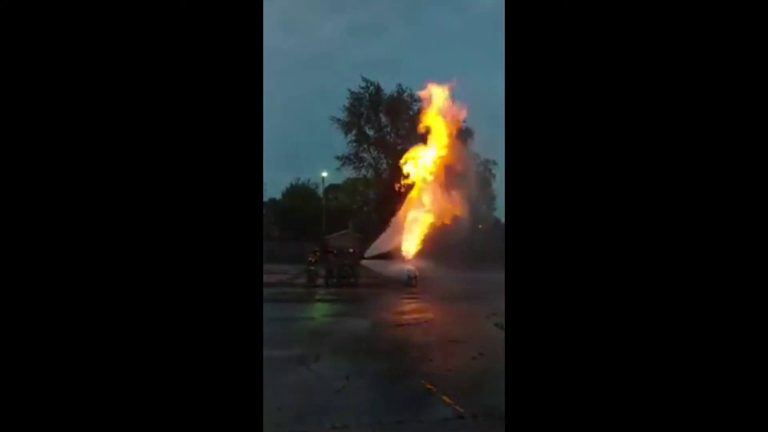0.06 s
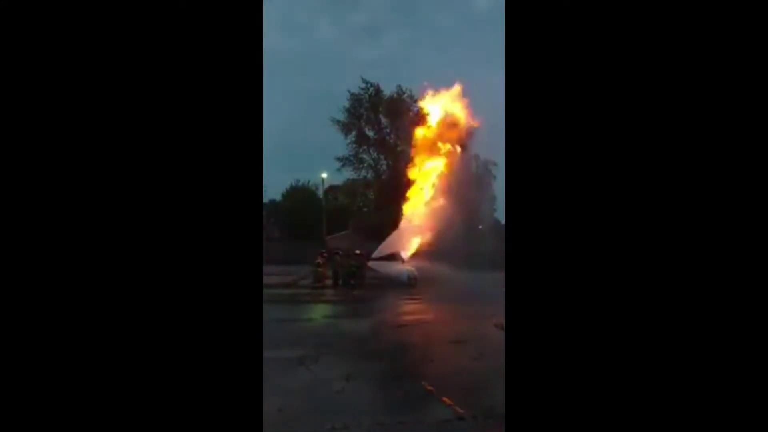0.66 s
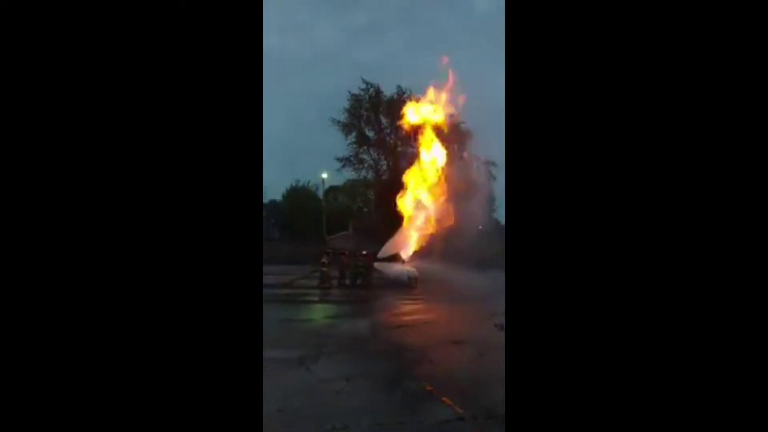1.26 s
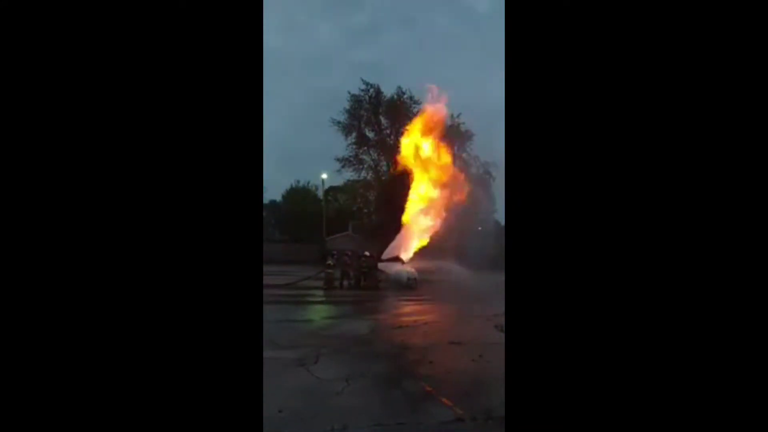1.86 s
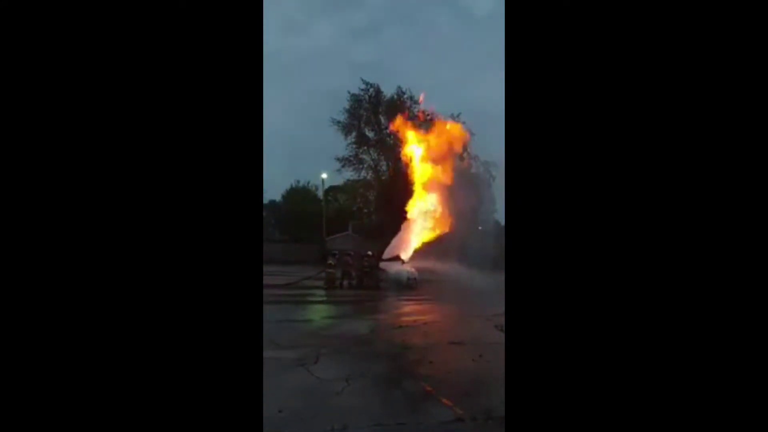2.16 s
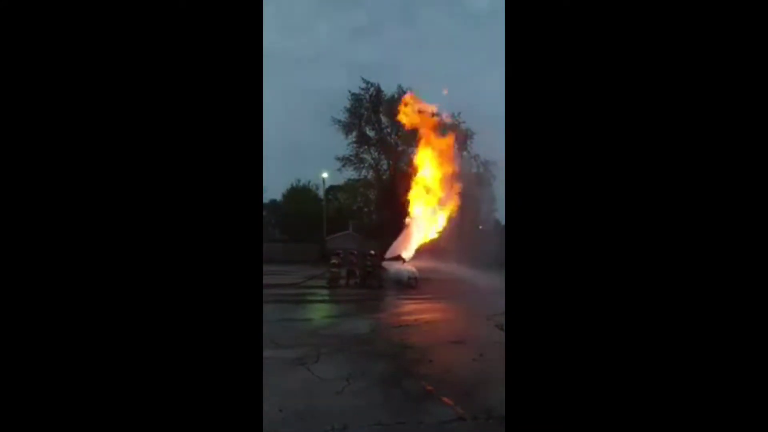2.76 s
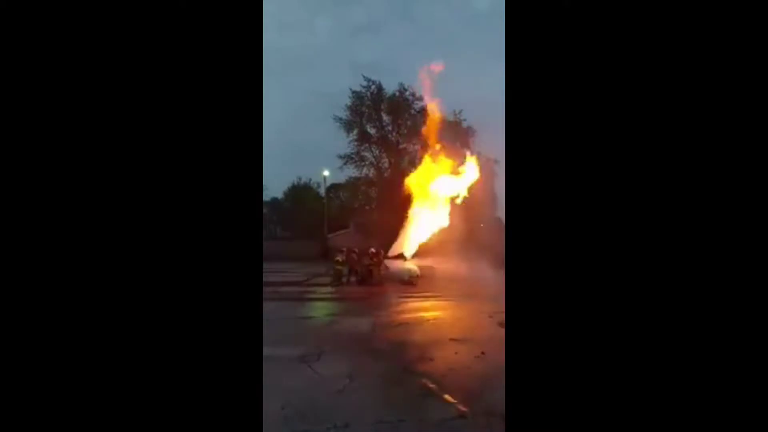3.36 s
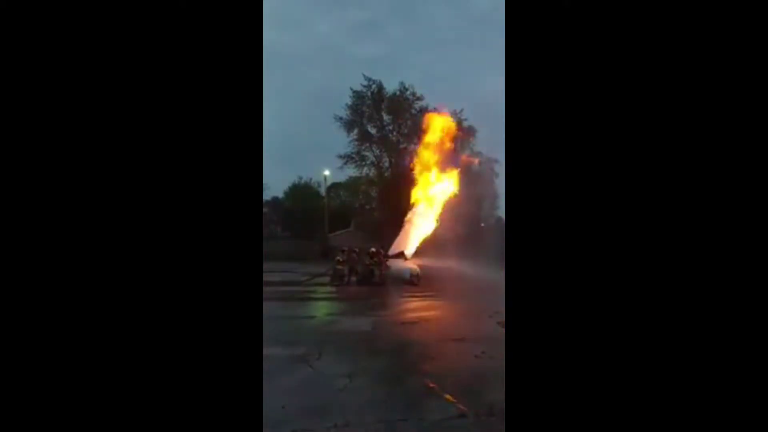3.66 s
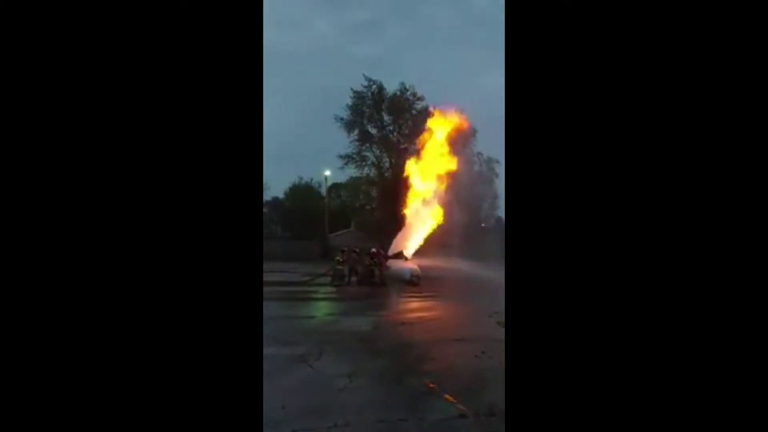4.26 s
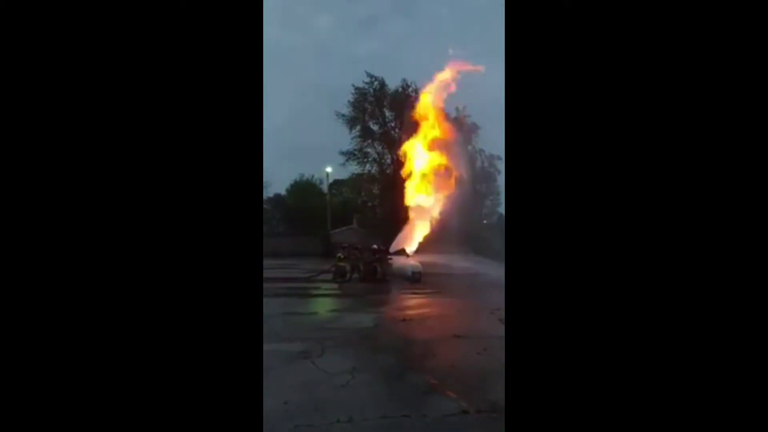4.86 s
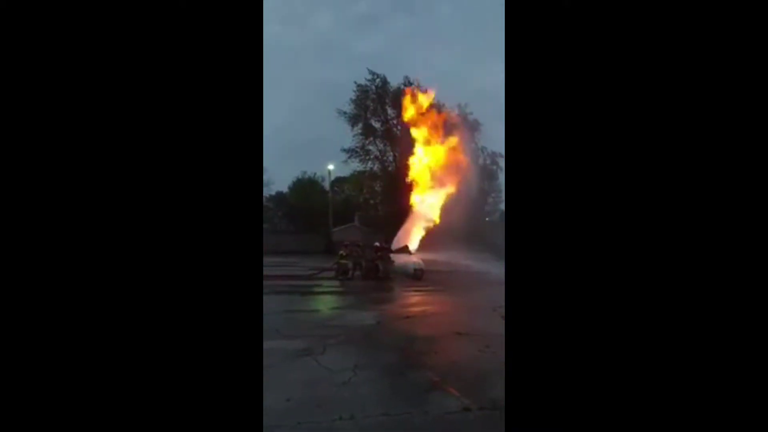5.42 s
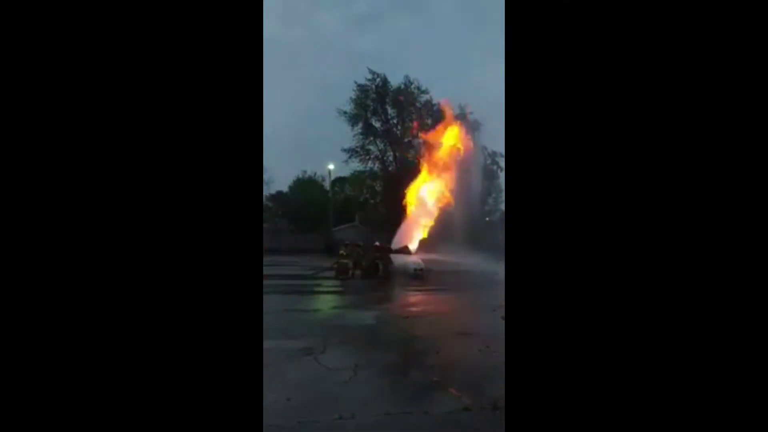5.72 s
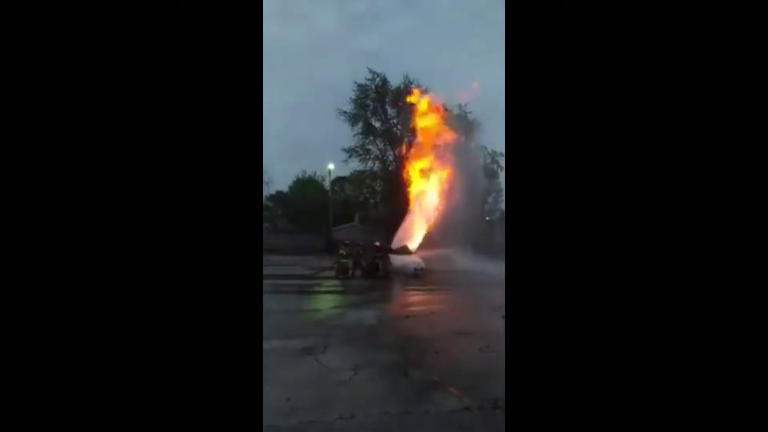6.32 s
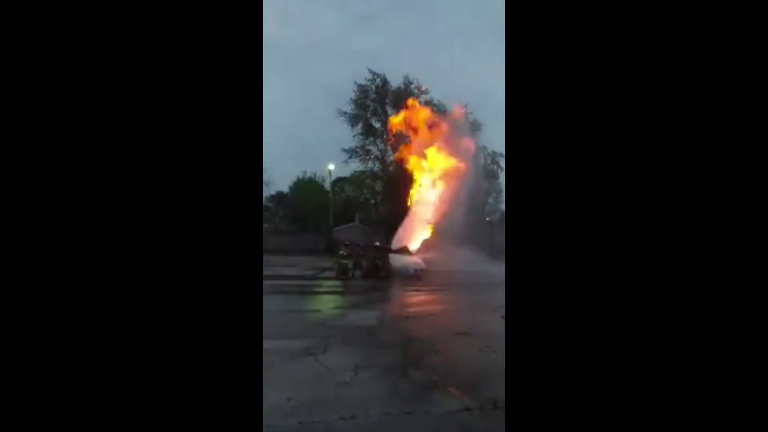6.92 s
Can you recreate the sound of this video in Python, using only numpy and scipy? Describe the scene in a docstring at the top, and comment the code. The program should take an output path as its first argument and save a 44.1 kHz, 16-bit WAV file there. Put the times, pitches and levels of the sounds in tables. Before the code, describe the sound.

In an open yard, a fluttering flame roar, a sharp gas hiss and the fizz of hoses spraying a tank blend into one continuous rush, heard from a distance. Wind bumps the handheld microphone at the start, again a second later, then hardest near three seconds, with short fuzzy hoots. Afterwards the fire surges a little and continues with the spray under a few lighter puffs.

```python
"""A propane jet burns from a tank in an open yard while hoses spray water on it, some way off.
From the start the swirling flame roars, escaping gas hisses and water fizzes on tank and wet ground.
Puffs of wind ruffle a handheld camera's two microphone ports, at times with a brief hoot:
at once, just after 1 s, and hardest near 2.7 s. Then the wind eases, the fire swells near 4.3 s,
and flame, gas and water carry on to the end, with a few lighter puffs."""
import sys
import numpy as np
from scipy import signal
from scipy.fft import rfft, irfft, next_fast_len
from scipy.io import wavfile
from scipy.ndimage import uniform_filter1d, map_coordinates

SR = 44100
rng = np.random.default_rng(int(sys.argv[2]) if len(sys.argv) > 2 else 0)


def dump_mix(stems):
    """Bounce the given channels to the path in sys.argv[1] as a 16-bit WAV at rate SR."""
    frames = np.atleast_2d(stems).T  # one column per channel
    limited = np.clip(frames, -1, 1)  # hard clip at full scale
    pcm = np.round(limited * 32767).astype(np.int16)
    wavfile.write(sys.argv[1], SR, pcm)


N = 312385

# how alike the fire sounds left and right: f/Hz, likeness (1 the same, -1 or less opposite)
FIRE_LIKENESS = [(250, -1.6), (400, 0.1), (560, 0.76), (660, 0.46), (800, 0.93), (1800, 0.89), (2000, 0.54),
                 (2350, 0.8), (2700, 0.86), (5000, 0.83), (5600, 0.54), (8500, 0.29)]


def flame(flame_db, plume_under_db=6, plume_follows=0.62):
    """Burning swirls: big ones billow in the plume, small ones flutter and roar near the nozzle."""
    # tone of the big swirls: f/Hz, relative level/dB
    billow_tone = [(190, -77), (280, -29), (335, -17.5), (400, -6.5), (515, -6.3), (565, -2), (605, -6.5),
                   (690, -4.5), (830, 0.7), (920, -3), (1050, -6), (1500, -18), (3000, -76)]
    # tone of the small swirls: f/Hz, relative level/dB
    roar_tone = [(500, -48), (900, -17.5), (1100, -5.5), (1210, -3), (1310, -3.5), (1410, -1.9),
                 (1520, -3.5), (1700, -5), (1880, -5.5), (2020, -6), (2300, -8), (3000, -26.5), (6000, -44)]
    usual_db = flame_db.mean()
    # the plume is quieter than the flame and follows only part of its swing
    plume_db = usual_db - plume_under_db + plume_follows * (flame_db - usual_db)
    plume_db += 0.34 * wobble(12)
    billow = amp(plume_db) * spread(turbulence(patchy_db=0.87), billow_tone, FIRE_LIKENESS)
    roar_db = flame_db + 0.15 * wobble(14)
    roar = amp(roar_db) * spread(turbulence(patchy_db=0.3), roar_tone, FIRE_LIKENESS)
    return billow + roar


def gas_jet(jet_db, flutter_db=0.2):
    """Gas tears out of the valve in a bright hiss."""
    # tone of the hiss: f/Hz, relative level/dB
    hiss_tone = [(1500, -44), (2300, -36), (2850, 0.5), (2960, -1.5), (3070, 1), (3220, -0.5), (3330, -0.5),
                 (3800, -1.5), (4000, 1), (4120, 1.5), (4250, 0), (4420, -0.5), (4500, -7), (5100, -7.5),
                 (5700, -8), (7200, -8), (8800, -14), (10500, -23), (15000, -37)]
    level_db = jet_db + flutter_db * wobble(12)
    return amp(level_db) * spread(turbulence(patchy_db=0.5), hiss_tone, FIRE_LIKENESS)


def fire_strength():
    """Levels in dB of flame and gas jet: the slowly changing flow, with short flares and sags on top."""
    # how hard the gas flows and burns: t/s, flame level/dB, jet level/dB
    gas_flow = [(0.0, -40.5, -39.5), (0.11, -39, -38.5), (0.3, -37.5, -38.5), (0.42, -41, -36),
                (0.66, -40.5, -37), (0.8, -40, -38), (1.0, -38.5, -35.5), (1.1, -37.5, -34.5),
                (1.33, -38.5, -36), (1.56, -39, -35), (1.76, -39.5, -37), (1.94, -41, -38.5),
                (2.08, -39.5, -36.5), (2.4, -39, -35.5), (2.7, -39.5, -36), (3.1, -40, -35.5),
                (3.36, -39.5, -38.5), (3.64, -41, -37), (3.94, -40.5, -37.5), (4.17, -39, -39),
                (4.3, -36, -34.5), (4.54, -38.5, -37), (4.8, -38, -36), (4.94, -37, -37.5),
                (5.1, -39, -36.5), (5.22, -36.5, -36), (5.38, -39.5, -36.5), (5.66, -40, -36.5),
                (5.92, -39.9, -36), (6.22, -40, -38), (6.55, -40, -36.5), (6.76, -39, -36.5),
                (6.98, -37.5, -34), (7.08, -39, -36.5)]
    # flares and sags: peak t/s, length/s, flame change/dB, jet change/dB
    flares = [(0.176, 0.11, 2.5, 2.5), (.34, .07, 0, 2.5), (0.5, 0.14, 2.5, 2.5), (0.672, .06, 1, -3),
              (0.908, 0.069, 4.5, 3.5), (1.0, 0.069, 0, 0.5), (1.2, 0.038, 2.6, -1), (1.29, 0.042, 1, 1.5),
              (1.454, 0.091, 0.5, 1), (1.563, 0.056, -1.2, -3), (1.85, 0.076, 1.5, 3.2),
              (1.96, .07, 0.5, 0.5), (2.4, .04, -0.5, -3), (2.492, 0.053, 0, 2), (2.8, 0.065, 1, 1.5),
              (2.977, 0.11, 2.5, -1), (3.517, 0.1, 3.5, 3), (3.797, 0.21, 3, 2), (4.063, 0.16, 2, 1.5),
              (4.433, 0.063, 1, 3.5), (4.677, 0.055, 1.4, 0.5), (4.935, .04, 0, -2.2),
              (4.988, 0.059, 0.5, 1.5), (5.293, 0.049, 2.6, 2.5), (5.365, .045, -0.5, -3),
              (5.775, 0.079, 3, 1), (6.554, 0.13, 0.5, 1.5)]
    t = np.arange(N) / SR
    level_db = np.array(curves(gas_flow))
    for peak, length, flame_db, jet_db in flares:
        swell = np.exp(-(2 * (t - peak) / length) ** 2)
        level_db += np.array([[flame_db], [jet_db]]) * swell
    return level_db


def water_spray(shimmer_db, drops_per_s=1500, drop_db=-11, boost_db=3.0, flutter_db=0.7):
    """A fine mist fizzes, and larger drops tick on the tank and the ground."""
    # the hose streams sweeping over the tank: t/s, level before the boost/dB
    hose_sweep = [(0.0, -45), (0.12, -46.5), (0.22, -43), (0.36, -46), (0.5, -41.5), (0.7, -44),
                  (0.84, -46), (1.02, -41.5), (1.12, -45.5), (1.36, -43), (1.55, -45), (1.72, -49),
                  (1.86, -46), (2.0, -45.5), (2.2, -47), (2.5, -43), (2.68, -51), (2.78, -46),
                  (2.91, -49.5), (3.05, -45), (3.2, -44), (3.35, -44.5), (3.5, -46), (3.6, -47),
                  (3.73, -43), (3.95, -46.5), (4.2, -43), (4.31, -41.5), (4.46, -42), (4.55, -43.5),
                  (4.8, -44), (4.94, -44.5), (5.04, -45), (5.17, -46), (5.3, -42.5), (5.52, -47),
                  (5.77, -43), (5.95, -44), (6.1, -41.5), (6.28, -42.5), (6.4, -46), (6.55, -44),
                  (6.68, -44.5), (6.88, -42), (7.08, -46)]
    # tone of the fizz: f/Hz, relative level/dB
    fizz_tone = [(1500, -45), (3500, 5), (5500, 6.5), (7000, 4.5), (8800, 6.5), (9500, 3.5), (10600, 1),
                 (12700, 0), (13100, -9), (15200, -5)]
    # how alike the water sounds left and right: f/Hz, likeness (0 unrelated, 1 the same)
    fizz_likeness = [(4000, 0.31), (8300, 0.66), (9000, 0.14), (15000, .13)]
    hits = rng.random((2, N)) < drops_per_s / SR
    drops = unit(hits * rng.standard_normal((2, N)))
    fizz = turbulence(patchy_db=2.1) + amp(drop_db) * drops
    sweep_db, = curves(hose_sweep)
    level_db = sweep_db + shimmer_db + boost_db + flutter_db * wobble(21)
    return amp(level_db) * spread(fizz, fizz_tone, fizz_likeness)


def ground_bounce(x, delay_s=0.00353, drift_s=0.000015, strength=0.095, dull_hz=4500):
    """The wet concrete sends a duller copy a moment later; heated air makes its path waver."""
    delayed_index = np.arange(N) - SR * (delay_s + drift_s * wobble(5.4))
    dull = filtered(x, lambda hz: 1 / np.sqrt(1 + (hz / dull_hz) ** 2))
    return strength * np.array([map_coordinates(channel, [delayed_index]) for channel in dull])


def wind(gust_above_db=-52, blend_db=3.0, flutter_db=2.0):
    """Air ruffles the microphone ports; harder puffs shed bigger swirls and so rumble deeper."""
    # tone of a hard puff: f/Hz, relative level/dB
    gust_tone = [(25, -37), (50, -41), (110, -38), (150, -28), (200, -8), (225, -9), (246, 3), (270, -2.5),
                 (300, -5), (340, -16), (450, -24), (1200, -80)]
    # tone of gentle air: f/Hz, relative level/dB
    breeze_tone = [(30, -42), (60, -46), (160, -34), (205, -27), (255, -2), (310, 5), (370, 2), (480, -28),
                   (1200, -87)]
    level_db = wind_strength() + flutter_db * wobble(14)
    gust_share = (1 + np.tanh((level_db - gust_above_db) / blend_db)) / 2
    gust = amp(-7.5) * shaped_noise(lambda hz: amp(along(gust_tone, hz)))
    breeze = shaped_noise(lambda hz: amp(along(breeze_tone, hz)))
    alike, opposite = amp(level_db) * (np.sqrt(gust_share) * gust + np.sqrt(1 - gust_share) * breeze)
    return np.array([alike + opposite, alike - opposite])


def wind_strength(rise_db_per_s=450, fall_db_per_s=300, arch_db=2.5, calm_drift_db=7):
    """How hard air pushes the two ports alike and oppositely, in dB: puffs rise, arch and die away."""
    # puffs of wind: start t/s, length/s, alike push/dB, opposite push/dB
    puffs = [(-.06, 0.19, -49, -40), (0.304, 0.059, -56, -56), (.39, 0.11, -59, -54),
             (0.566, 0.25, -54, -55), (0.833, 0.24, -56, -54), (1.102, 0.148, -49, -43),
             (1.27, 0.36, -56, -56), (1.714, 0.032, -56, -59), (2.03, .06, -54, -55),
             (2.118, 0.1, -55.5, -61), (2.462, 0.054, -78, -39), (2.62, 0.17, -39.5, -45),
             (2.758, 0.069, -41, -35), (3.69, 0.035, -67, -68), (4.024, 0.09, -69, -72),
             (4.238, 0.14, -69, -72), (4.662, 0.043, -66, -74), (4.884, 0.038, -64, -70),
             (5.324, 0.046, -57, -56), (5.905, 0.088, -55.5, -58), (6.02, 0.17, -56.5, -59),
             (6.743, .04, -65, -72)]
    t = np.arange(N) / SR
    level_db = np.array([[-88.5], [-74]]) + calm_drift_db * wobble(8)  # light, restless air
    for start, length, alike_db, opposite_db in puffs:
        rise_db = rise_db_per_s * (t - start)
        fall_db = fall_db_per_s * (start + length - t)
        from_middle = np.clip(2 * (t - start) / length - 1, -1, 1)
        shape_db = np.minimum(0, np.minimum(rise_db, fall_db)) - arch_db * from_middle ** 2
        level_db = np.maximum(level_db, shape_db + np.array([[alike_db], [opposite_db]]))
    return level_db


def hoots(flutter_per_s=45):
    """Now and then the wind narrows into a brief, fuzzy hoot that slides a little in pitch."""
    # wind hoots: start t/s, end t/s, first f/Hz, last f/Hz, level at the middle/dB
    wind_hoots = [(-.09, 0.186, 243, 246, -50), (1.059, 1.258, 240.6, 244, -42.5),
                  (1.52, 1.68, 507, 490, -45), (2.6, 2.8, 246.6, 256, -44), (6.821, 7.0, 574, 603, -53)]
    t = np.arange(N) / SR
    # shaking a tone's strength and phase makes it a narrow noise, different at each port
    fuzz = np.array([wobble(flutter_per_s) + 1j * wobble(flutter_per_s) for port in ("left", "right")])
    out = np.zeros((2, N))
    for start, end, first_hz, last_hz, level_db in wind_hoots:
        span = (t > start) & (t < end)
        progress = (t[span] - start) / (end - start)
        phase = 2 * np.pi * np.cumsum(first_hz + (last_hz - first_hz) * progress) / SR
        fuzzy_tone = unit((fuzz[:, span] * np.exp(1j * phase)).real)
        out[:, span] += amp(level_db) * np.sin(np.pi * progress) ** 2 * fuzzy_tone
    return out


def faint_rumble(level_db=-106, below_hz=250):
    """A very faint rumble under everything."""
    return amp(level_db) * shaped_noise(lambda hz: 1 / (1 + (hz / below_hz) ** 2))


def flecked(x):
    """Narrow bands of pitch briefly drop out and their neighbours swell, so the hiss sounds watery."""
    # how deep the drop-outs tend to go: f/Hz, depth scale/dB
    dropout_depths = [(300, 1), (600, 2.5), (1400, 3), (1750, 5.5), (2100, 11), (2900, 7.5), (3650, 8),
                      (4100, 4), (5200, 4.5), (8000, 3.5), (12000, 4.5)]
    hz, _, bands = signal.stft(x, SR, nperseg=2048)
    flecks = random_patches(bands.shape[1:], bands_wide=3)
    dropout = np.logaddexp(0, 2 * flecks - 1)  # mostly small, now and then large
    gain = amp(-along(dropout_depths, hz)[:, None] * dropout)
    # energy only shifts between neighbouring pitches
    nearby_power = np.abs(uniform_filter1d(gain ** 2, size=24, axis=0))
    gain /= np.sqrt(nearby_power + 1e-12)
    return signal.istft(bands * gain, SR, nperseg=2048)[1][:, :N]


def hollowed(x, waver=0.18, turns_per_s=12, fill_snap=2.5, fill_rarity=0.4):
    """Narrow, wavering dips hollow the sound: the deepest stays, the others fill in now and then."""
    # dips in the tone: f/Hz, width/Hz, depth/dB, steepness of the sides, share lost when filled in
    dips = [(995, 33, 7.5, 2.7, 0.83), (1560, 15, 6, 3, .7), (2145, 50, 6.5, 3, 1),
            (2542, 201, 36.5, 7.2, .05), (3500, 82, 1.5, 3, 0.86), (4530, 35, 3, 3, .5),
            (5040, 74, 4, 3, .5), (6280, 172, 34, 2.2, 0.63), (10020, 173, 32, 4, 0.55)]
    hz, times, bands = signal.stft(x, SR, nperseg=4096, noverlap=3072)
    for centre, width, depth, steepness, fill_share in dips:
        near = np.abs(hz - centre) < 3 * width
        drift_hz = waver * width * wobble(turns_per_s, times)
        span_hz = width * np.exp(waver * wobble(turns_per_s, times))
        away = np.abs(hz[near, None] - centre - drift_hz) / span_hz
        filled = (1 + np.tanh(fill_snap * (wobble(turns_per_s, times) - fill_rarity))) / 2
        dip_db = depth * (1 - fill_share * filled)
        bands[:, near] *= amp(-dip_db * np.exp(-away ** steepness))
    return signal.istft(bands, SR, nperseg=4096, noverlap=3072)[1][:, :N]


def turbulence(patchy_db):
    """Two unrelated noises that grow louder and softer in broad patches of pitch and time."""
    bands = signal.stft(rng.standard_normal((2, N)), nperseg=2048)[2]
    gain = amp(patchy_db * random_patches(bands.shape[1:], bands_wide=14))
    return unit(signal.istft(bands * gain, nperseg=2048)[1][:, :N])


def random_patches(shape, bands_wide):
    """A random grid of pitch by time, blurred both ways into patches."""
    blurred = uniform_filter1d(rng.standard_normal(shape), size=bands_wide, axis=0)
    return unit(uniform_filter1d(blurred, size=4, axis=1))


def spread(pair, tone, likeness):
    """Give two unrelated signals a tone and mix them into a partly alike left and right."""
    def response(hz):
        angle = np.arccos(np.clip(along(likeness, hz), -1, 1)) / 2
        return amp(along(tone, hz)) * [np.cos(angle), np.sin(angle)]
    alike, opposite = filtered(pair, response)
    return unit(np.array([alike + opposite, alike - opposite]))


def shaped_noise(response):
    """Two unrelated noises, filtered and brought to an average size of 1."""
    return unit(filtered(rng.standard_normal((2, N)), response))


def filtered(x, response):
    """Turn each frequency of x up or down by the gain response(hz)."""
    size = next_fast_len(N + SR // 2)
    hz = np.fft.rfftfreq(size, 1 / SR)
    return irfft(rfft(x, size) * response(hz), size)[..., :N]


def wobble(per_s, times=None):
    """A smooth curve through per_s random values a second, read at the times given or every sample."""
    coarse_times = np.linspace(0, N / SR, num=N // 64)
    values = rng.standard_normal(int(N * per_s / SR) + 4)
    curve = map_coordinates(values, [coarse_times * per_s])
    return np.interp(np.arange(N) / SR if times is None else times, coarse_times, curve)


def curves(rows):
    """Join timed rows with straight lines: one curve for each column after the time."""
    times, *columns = np.transpose(rows)
    return [np.interp(np.arange(N) / SR, times, column) for column in columns]


def along(points, hz):
    """Read between (frequency, value) points on a pitch-like (log) scale."""
    point_hz, values = np.transpose(points)
    return np.interp(np.log(hz + 1), np.log(point_hz + 1), values)


def amp(db):
    """Decibels to gain."""
    return 10 ** (np.asarray(db) / 20)


def unit(x):
    """Scale x to an average size (rms) of 1."""
    return x / np.sqrt(np.mean(x ** 2) + 1e-20)


def scene(shimmer_depth_db=0.63, shimmer_per_s=26, lean_left_db=0.15):
    """Fire and water ahead, wind at the camera."""
    flame_db, jet_db = fire_strength()
    # hot, moving air makes all of the distant hiss swell and fade together
    shimmer_db = shimmer_depth_db * wobble(shimmer_per_s)
    fire = flame(flame_db + shimmer_db) + gas_jet(jet_db + shimmer_db)
    yard = fire + ground_bounce(fire) + water_spray(shimmer_db)
    balance = amp([[lean_left_db], [-lean_left_db]])
    return flecked(yard) * balance + wind() + hoots() + faint_rumble()


def record(dry, top_hz=15330):
    """The sound is slightly hollow, and the camera picks up nothing above top_hz."""
    return filtered(hollowed(dry), lambda hz: hz < top_hz)


dry = scene()
out = record(dry)
dump_mix(out)
```